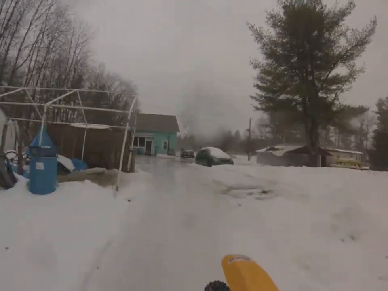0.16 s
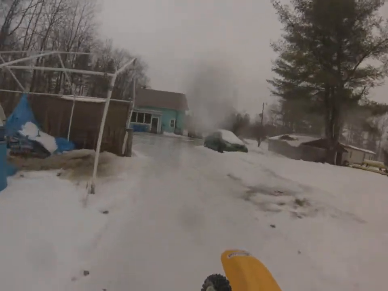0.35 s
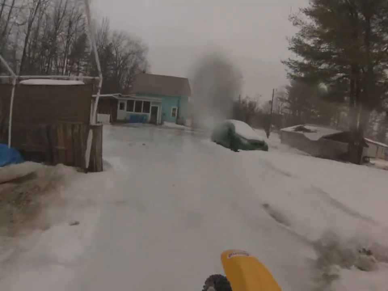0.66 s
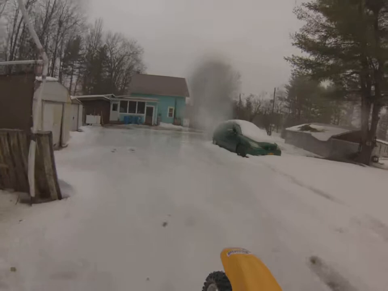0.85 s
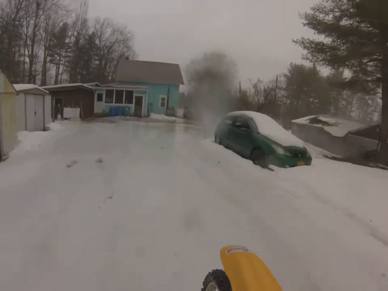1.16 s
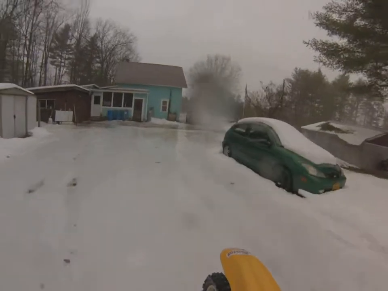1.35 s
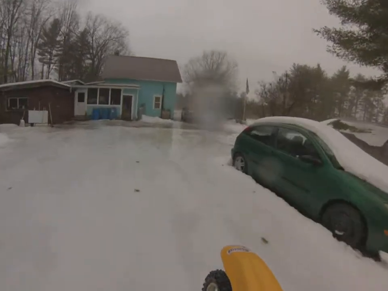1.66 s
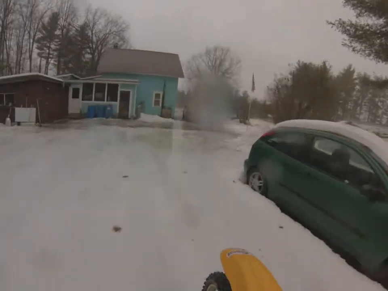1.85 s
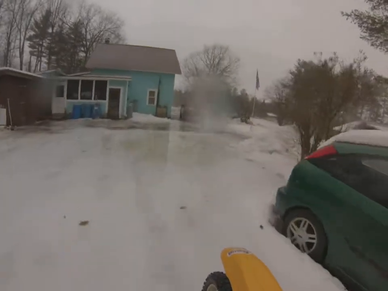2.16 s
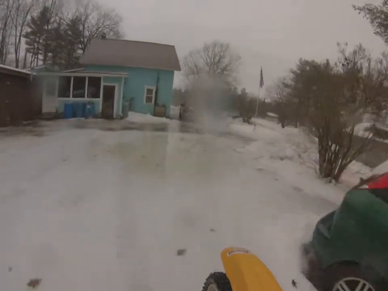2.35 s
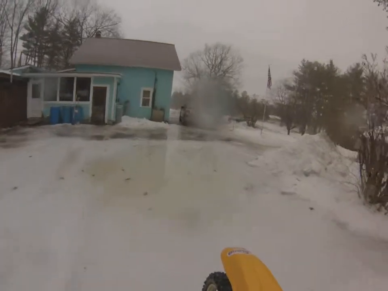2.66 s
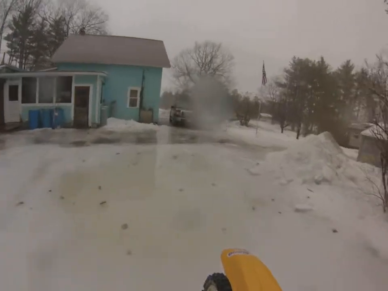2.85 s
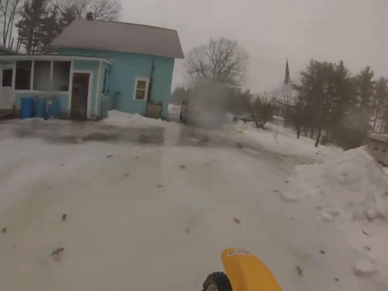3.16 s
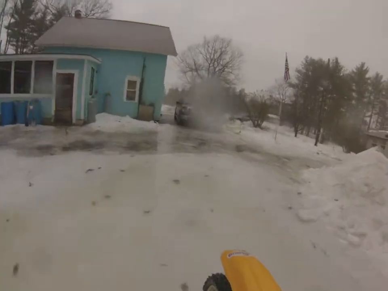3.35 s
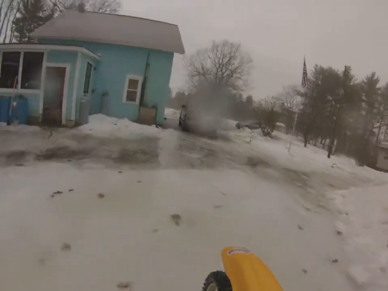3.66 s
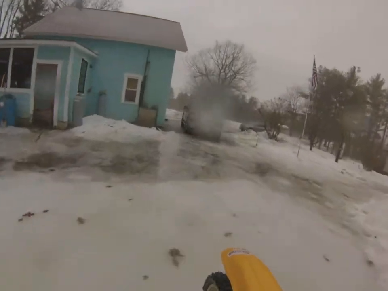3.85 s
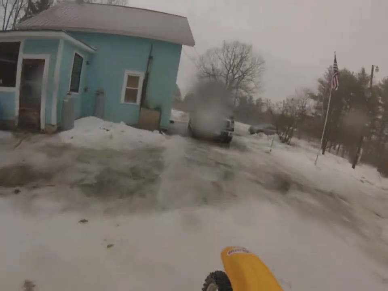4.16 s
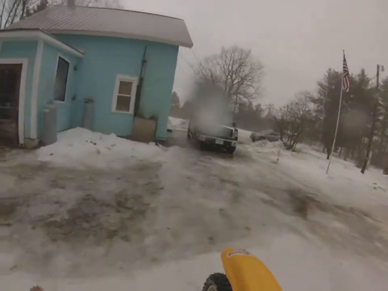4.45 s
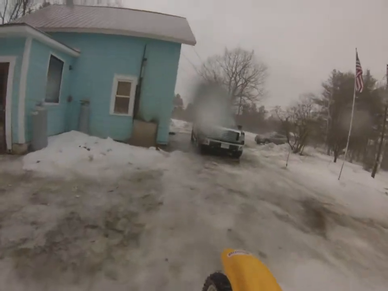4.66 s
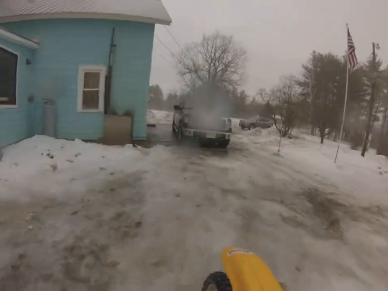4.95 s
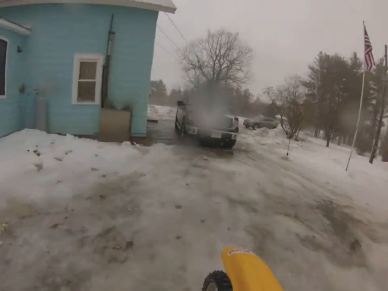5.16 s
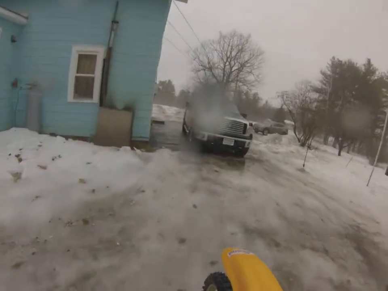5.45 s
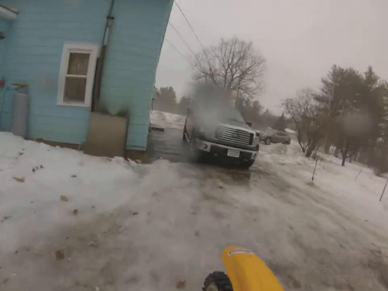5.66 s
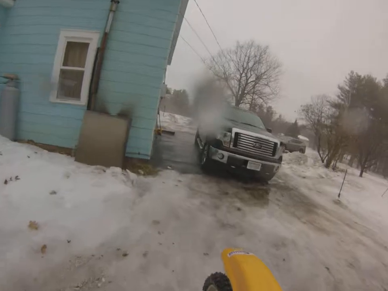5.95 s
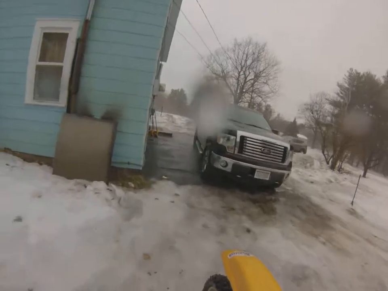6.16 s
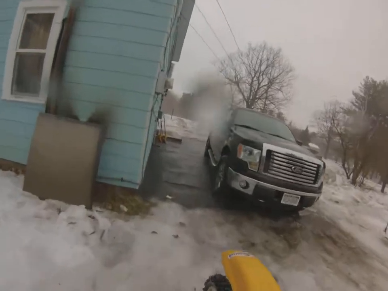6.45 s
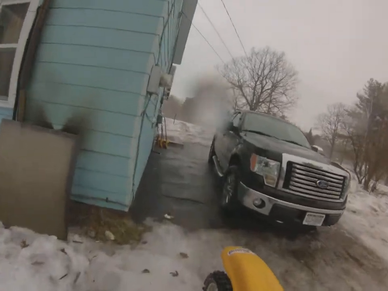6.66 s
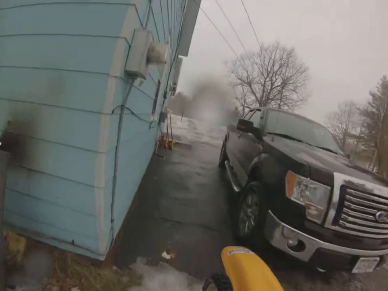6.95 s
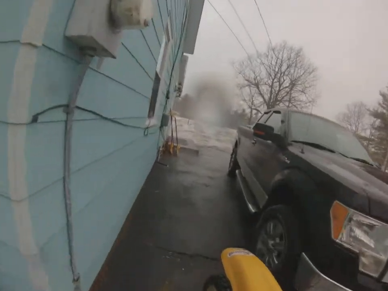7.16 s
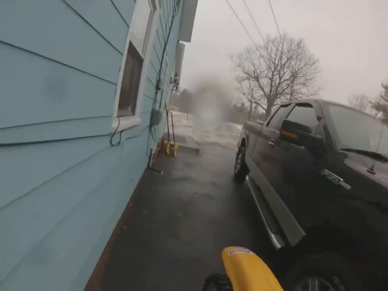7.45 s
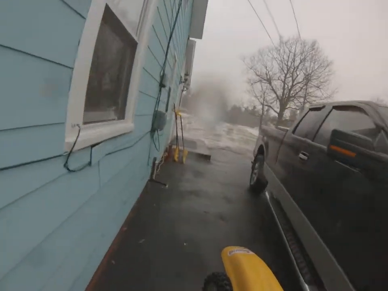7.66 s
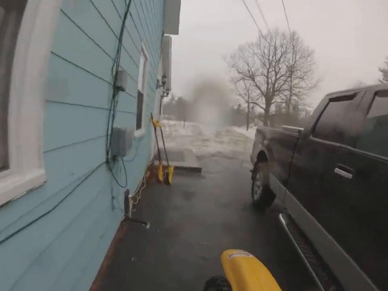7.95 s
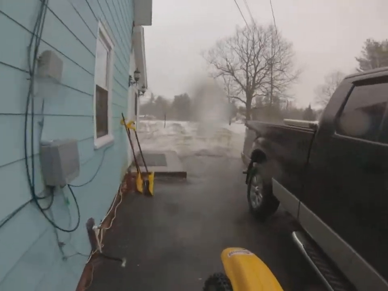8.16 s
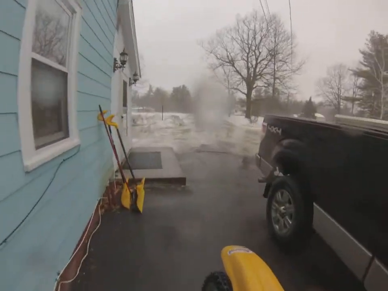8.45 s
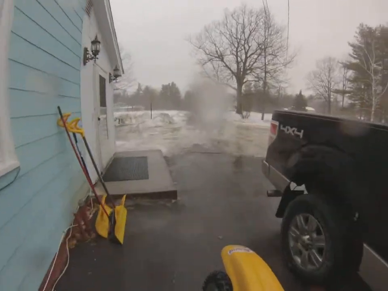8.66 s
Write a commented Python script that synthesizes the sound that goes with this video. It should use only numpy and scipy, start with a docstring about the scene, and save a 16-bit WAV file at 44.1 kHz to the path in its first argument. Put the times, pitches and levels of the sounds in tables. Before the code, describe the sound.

A two-stroke dirt bike is heard close up from the rider's helmet, over a steady, deep wind rumble. It opens with two quick, rasping throttle blips, one right at the start and one around 0.5 seconds, the loudest part. From about 1 second the engine runs slowly down, dropping in pitch and level, with a low throb and dry metallic piston ticking. The tyres crunch softly, and thin ice snaps now and then until about 3 seconds. A small part rattles faintly near 1.5 seconds, and another clacks at 3.2. Slush hisses lightly from 3 to 4 seconds. From about 4 seconds the engine idles lumpily with irregular pops and knocks, quickening a little after 5.5 and continuing until the end near 9 seconds, with faint wet tyre hiss from 7.5. Raindrops tick sharply on the microphone housing several times in the first 2 seconds and once near 4.7.

```python
"""Two blips of the throttle from a two-stroke dirt bike, heard from the rider's helmet. The engine runs
down slowly to a lumpy idle, firing only every few turns, as the bike rolls down an icy driveway in rain.
Puffs of gas make the exhaust pipe ring, pumped air throbs and drones, and the piston knocks on metal.
The tyres crunch over ice and hiss through slush, the headwind rumbles, loose parts rattle and clack,
and a few raindrops tap on the microphone's plastic housing."""
import sys
import numpy as np
from scipy import signal
from scipy.fft import rfft, irfft
from scipy.io import wavfile
from scipy.ndimage import uniform_filter1d

SR = 44100
rng = np.random.default_rng(int(sys.argv[2]) if len(sys.argv) > 2 else 0)


def wav_record(signal):
    """Record a signal, one row per channel, as 16-bit PCM in the file named by sys.argv[1]."""
    frames = np.transpose(np.atleast_2d(signal))
    bounded = np.clip(frames, -1, 1)
    # unit amplitude maps onto the largest positive 16-bit level
    quanta = np.round(bounded * 32767).astype(np.int16)
    wavfile.write(sys.argv[1], SR, quanta)


N = 388080
TIME = np.arange(N) / SR

# single hard firings during the blips: t/s, extra strength/dB, level of the rasp/dB
HARD_FIRINGS = [(0.049, 3.5, -28), (.133, 2, -29), (.160, 3.5, -28), (.199, 1, -35), (0.225, 0, -36),
                (.394, 2, -39), (.422, 5.5, -39), (.471, 5, -24), (0.539, -4, -27), (.613, 5, -42)]
# notes that the cylinder and engine cases ring with: f/Hz, width/Hz, level/dB
ENGINE_RINGS = [(850, 83, -9), (1072, 78, 0.5), (1216.5, 53, 7), (1498, 104, 3), (1621, 131, 6),
                (1746, 42, 6), (1938, 108, -0.5), (2224, 230, -5.5), (2586, 103, -7.5), (3110, 90, -14),
                (3990, 42, -20), (4700, 85, -27.5), (5330, 54, -20)]
# tone colour of breaking ice: f/Hz, relative level/dB
ICE_SPECTRUM = [(1000, -0.5), (3000, 4.5), (3900, -7), (4800, -3.5), (6400, -7), (7600, -7.5),
                (9300, -10.5), (11500, -7.5), (13500, -19), (16000, -25)]


def from_db(db):
    """Turn decibels into a factor to multiply by."""
    return 10 ** (np.asarray(db) / 20)


def rms_one(x):
    """Scale a sound so that its average strength (rms) is 1."""
    return x / np.sqrt(np.mean(x ** 2) + 1e-20)


def in_time(rows):
    """Join a table's points with straight lines: one curve for each column after the time."""
    s, *columns = np.transpose(rows)
    return [np.interp(TIME, s, column) for column in columns]


def evened(x, span_s):
    """Hold the average strength at 1 over stretches of about span_s."""
    size = int(span_s * SR)
    power = uniform_filter1d(uniform_filter1d(x * x, size), size)
    return x / np.sqrt(np.abs(power) + 1e-14)


def keep(x, hz, side, order=2):
    """Keep the "low" or the "high" side of hz; a higher order cuts more steeply."""
    return signal.sosfilt(signal.butter(order, hz, side, fs=SR, output="sos"), x + 1e-18)


def resonate(x, hz, width_hz):
    """Ring at one note; the narrower the width, the longer the ring."""
    r = np.exp(-np.pi * width_hz / SR)
    feedback = [1, -2 * r * np.cos(2 * np.pi * hz / SR), r * r]
    return signal.lfilter(np.array([1, 0, -1]) * (1 - r * r) / 2, feedback, x + 1e-18)


def body(x, rings):
    """An object rings at several notes at once; every other one is added upside down."""
    return sum((-1) ** k * from_db(db) * resonate(x, hz, width)
               for k, (hz, width, db) in enumerate(rings))


def coloured(x, spectrum):
    """Give a noise a tone colour, at average strength 1."""
    hz, db = np.transpose(spectrum)
    bins_hz = np.maximum(np.arange(N // 2 + 1) * SR / N, 1)
    gains = from_db(np.interp(np.log(bins_hz), np.log(hz), db))
    return rms_one(irfft(rfft(x) * gains, N))


def noise():
    """White noise: an even hiss."""
    return rng.standard_normal(N)


def clicks(times, sizes):
    """One sharp click at each time."""
    out = np.zeros(N)
    inside = (times >= 0) & (times < TIME[-1])
    out[(times[inside] * SR).astype(int)] = sizes[inside]
    return out


def puffs(times, sizes, rise_s, decay_s):
    """A loudness curve that swells and dies away after each time."""
    up, down = np.exp(-1 / (rise_s * SR)), np.exp(-1 / (decay_s * SR))
    return signal.lfilter([1 - up], np.poly([up, down]), clicks(times, sizes) + 1e-18)


def strike(times, sizes, grit, rise_s, decay_s):
    """Rough hits: each is a click with a short puff of noise."""
    return clicks(times, sizes) + grit * puffs(times, sizes, rise_s, decay_s) * noise()


def gate(start_s, end_s, rise_s, fall_s):
    """A curve that rises from the start, holds, and falls after the end."""
    return np.clip((TIME - start_s) / rise_s, 0, 1) * np.clip(1 - (TIME - end_s) / fall_s, 0, 1)


def headwind():
    """Air rushing past the rider makes a steady, deep rumble."""
    # tone colour of the wind: f/Hz, relative level/dB
    spectrum = [(15, 3), (28, 2.5), (50, 8), (90, -6.5), (130, -18), (230, -21), (600, -20), (1500, -56),
                (4000, -90)]
    return from_db(-31) * coloured(noise(), spectrum)


def low_hum():
    """A low, rough hum near 250 Hz swells and fades as the engine slows."""
    # loudness of the hum: t/s, level/dB
    levels = [(.6, -35), (1.7, -48.5), (2.3, -42.5), (2.9, -52), (3.3, -39), (3.8, -44), (4.5, -47)]
    hum = resonate(noise(), hz=267.5, width_hz=62)
    hum = resonate(hum, hz=238, width_hz=39)
    return from_db(in_time(levels)[0]) * rms_one(hum)


def ice_and_slush(grains_per_s=250, spread_db=8.5, edge_s=0.16, road_hiss_db=-72):
    """Slush hisses under the tyres; ice crunches in many tiny cracks of uneven size."""
    # patches of ice and slush: start/s, end/s, wet hiss/dB, crunch/dB
    patches = [(0, 0.874, -70, -57), (2.25, 2.3, -71, -62), (3.129, 4.155, -61, -65.5),
               (7.5, 8.795, -68, -84)]
    # tone colour of slush: f/Hz, relative level/dB
    slush_spectrum = [(800, -10), (2500, 9), (4000, -1), (5300, 3), (6000, -29.5), (7500, -1), (8600, -14),
                      (10500, -35), (12300, -31), (13500, -31), (16000, -18)]
    wet, crunch = sum(np.outer(from_db(levels_db), gate(start - edge_s, end, edge_s, edge_s))
                      for start, end, *levels_db in patches)
    sizes = from_db(spread_db * np.minimum(rng.exponential(1, N), 2.5))
    cracked = rng.random(N) < grains_per_s / SR
    grains = puffs(TIME[cracked], sizes[cracked], rise_s=0.0001, decay_s=0.001) * noise()
    slush = np.hypot(wet, from_db(road_hiss_db)) * coloured(noise(), slush_spectrum)
    return slush + crunch * coloured(grains, ICE_SPECTRUM)


def ice_cracks():
    """Now and then a thin plate of ice snaps under a tyre."""
    # single snaps: t/s, level/dB
    snaps = [(0.620, -43), (0.659, -48), (0.780, -44), (0.874, -44), (0.888, -47), (1.402, -47),
             (1.844, -44), (2.288, -49), (2.465, -45.5), (2.811, -48), (2.859, -45.5)]
    s, db = np.transpose(snaps)
    bursts = puffs(s, from_db(db), rise_s=0.0001, decay_s=0.0018)
    return coloured(bursts * noise(), ICE_SPECTRUM) * np.sqrt(np.mean(bursts ** 2))


def raindrops(width_hz=1030):
    """Each drop gives the plastic housing a bright tick; where it lands brings out two notes."""
    # drops: t/s, peak level/dB, first note/Hz, second note/Hz
    drops = [(0.052, -21.5, 7350, 5300), (0.162, -27.5, 11800, 5550), (1.197, -31, 5900, 4630),
             (1.226, -35.5, 12000, 6260), (1.666, -36, 11300, 7560), (1.989, -24.5, 5530, 7600),
             (4.731, -30.5, 9850, 8000)]
    # notes of the housing itself: f/Hz, width/Hz, level/dB
    housing_rings = [(2840, 600, 3.5), (4970, 820, 0.5), (7300, 430, -12), (12400, 910, -13)]
    out = np.zeros(N)
    for s, db, first_hz, second_hz in drops:
        splash = strike(np.array([s]), np.ones(1), grit=0.12, rise_s=0.00013, decay_s=0.0016)
        tick = resonate(splash, first_hz, width_hz)
        tick += from_db(6) * resonate(splash, second_hz, width_hz / 2)
        tick += from_db(2.5) * body(splash, housing_rings)
        out += from_db(db) * tick / np.abs(tick).max()
    return out


def clack(at_s=3.242, peak_db=-30):
    """A loose part strikes the frame once and chatters for an instant."""
    # notes of the part: f/Hz, width/Hz, level/dB
    part_rings = [(2290, 150, 7), (3740, 500, -5), (4460, 530, -2), (6760, 460, -16)]
    hit = strike(np.array([at_s]), np.ones(1), grit=0.13, rise_s=0.00022, decay_s=0.0029)
    ring = body(hit, part_rings)
    return from_db(peak_db) * ring / np.abs(ring).max()


def rattle(times, start_s=1.45, end_s=1.73, scatter_db=1.5, peak_db=-40.5):
    """For a moment the slowing engine shakes a small loose part: one bright tick a turn."""
    # notes of the small part: f/Hz, width/Hz, level/dB
    part_rings = [(4850, 500, -2), (7650, 600, -4), (11400, 1300, -6)]
    ticks = clicks(times, from_db(scatter_db * noise()[:len(times)]))
    ring = body(ticks * gate(start_s, end_s, rise_s=0.06, fall_s=0.06), part_rings)
    return from_db(peak_db) * ring / np.abs(ring).max()


def throttle(lag_s=0.032):
    """What the blips add to speed, bark and clatter; the heavy flywheel makes the speed lag."""
    # blips: opens/s, shuts/s, added speed/(turns per s), added bark/dB, added clatter/dB
    blips = [(0.011, 0.228, 7.2, 3.5, 4.5), (0.368, 0.543, 19, 4, 8.5)]
    speed, bark_db, clatter_db = sum(np.outer(gains, gate(opens, shuts, rise_s=0.099, fall_s=0.055))
                                     for opens, shuts, *gains in blips)
    inertia = np.exp(-1 / (lag_s * SR))
    return signal.lfilter([1 - inertia], [1, -inertia], speed + 1e-18), bark_db, clatter_db


def crank_angle(blip_speed, fired, surge_turns=0.17):
    """How far the engine's shaft has spun, in turns; it surges after each idle firing, then slows."""
    # speed of the shaft without the blips: t/s, speed/(turns per s)
    speeds = [(0, 69.5), (.35, 68), (.62, 68), (.8, 64), (.97, 64.3), (1.05, 58.5), (1.15, 54.5),
              (1.4, 49.3), (1.65, 46), (1.85, 44.3), (2.15, 43), (2.35, 43.5), (2.55, 40.3), (2.85, 38.6),
              (3.2, 38), (3.4, 39.3), (3.57, 41), (3.85, 37), (4.1, 34.5), (4.75, 26.9), (5.25, 24.8),
              (5.5, 28), (7.7, 31), (8.8, 35)]
    turns = np.cumsum(in_time(speeds)[0] + blip_speed) / SR
    firing_s = np.concatenate([np.transpose(HARD_FIRINGS)[0], fired])
    at_firing = np.interp(firing_s, TIME, turns)
    whole = np.cumsum(np.round(np.diff(at_firing, prepend=0)))
    nudge = np.interp(TIME, firing_s, whole - at_firing)  # puts each firing on a whole turn
    progress = np.interp(TIME, fired, np.arange(len(fired))) % 1  # 0 to 1 between idle firings
    return turns + nudge + surge_turns * np.sin(np.pi * progress ** 0.81)


def strokes(angle, fired, pop_db, coast_db=-5.5, scatter_db=2.55):
    """The time and strength of every turn, and whether it is one of the idle firings."""
    times = np.interp(np.arange(np.ceil(angle[0]), angle[-1]), angle, TIME)
    firing_turns = np.abs(times[:, None] - fired).argmin(axis=0)
    level_db = coast_db + scatter_db * noise()[:len(times)]
    level_db[np.minimum(firing_turns + 1, len(times) - 1)] -= 1  # the next turn is a little softer
    level_db[firing_turns] = pop_db
    for s, extra_db, _ in HARD_FIRINGS:
        level_db[np.abs(times - s).argmin()] += extra_db
    return times, from_db(level_db), np.isin(np.arange(len(times)), firing_turns)


def gas_hiss(times, sizes, fired, spit_db, hiss_db):
    """Gas hisses a little on every turn and spits just after each idle firing."""
    # tone colour of the gas: f/Hz, relative level/dB
    spectrum = [(1500, 16.5), (3000, 1.5), (4000, 3), (4900, 1), (5450, 6), (5900, 0), (6500, 4.5),
                (7900, -0.5), (9000, -6.5), (11000, -3.5), (12800, -4.5), (14000, -15), (16000, -19)]
    pulses = puffs(times, sizes ** 0.48, rise_s=0.005, decay_s=0.009) + 0.14
    hiss = from_db(hiss_db + 0.5) * evened(pulses, span_s=0.16)
    spits = puffs(fired + 0.0057, from_db(spit_db + 15.5), rise_s=0.0029, decay_s=0.0062)
    return np.hypot(hiss, spits) * coloured(noise(), spectrum)


def piston_slap(times, late_s=0.00199):
    """The piston slaps the cylinder wall once a turn: a dry tick."""
    # loudness of the slap, highest while the engine coasts: t/s, level/dB
    levels = [(.6, -58), (1.2, -56.5), (1.8, -54.5), (2.4, -50.5), (3.6, -51), (4.4, -53), (8.8, -57.5)]
    # notes that the slap sets ringing: f/Hz, width/Hz, level/dB
    piston_rings = [(1617, 87, 2.5), (1810, 97, 0), (1960, 57, 3.5), (2660, 250, -14), (3115, 80, -15),
                    (5410, 110, -21)]
    sizes = rng.uniform(0.46, 1, len(times))
    hits = strike(times + late_s, sizes, grit=0.27, rise_s=0.00061, decay_s=0.0027)
    ticks = keep(body(hits, piston_rings), 1000, "high")
    return from_db(in_time(levels)[0]) * rms_one(ticks)


def clatter(times, sizes, rise_s=0.0033, decay_s=0.0063, whirr=0.097):
    """The piston knocks and scuffs at the top of each turn, more softly at the bottom; gears whirr."""
    halfway = times[:-1] + np.diff(times) / 2
    bottom_scuffs = puffs(halfway, rng.uniform(0, 0.17, len(halfway)), rise_s, decay_s)
    top_scuffs = puffs(times, sizes ** 0.49, rise_s, decay_s)
    knocks = clicks(times + 0.001954, 1.2 * sizes ** 0.86)
    force = (top_scuffs + bottom_scuffs + whirr) * noise() + knocks
    return evened(keep(body(force, ENGINE_RINGS), 690, "high"), span_s=0.26)


def idle_knocks(fired, pop_db, early_s=0.00094):
    """Each firing at idle also raps the cylinder: one dry metallic knock."""
    sizes = from_db(0.98 * pop_db - 36)
    raps = puffs(fired - early_s, sizes, rise_s=0.00037, decay_s=0.0073) * noise()
    return body(raps, ENGINE_RINGS)


def intake(times, lag_turns=0.4, scatter_db=2.5, jitter_s=0.00031):
    """After each exhaust puff the engine gulps air; the slightly uneven gulps make the inlet drone."""
    # loudness of the drone: t/s, level/dB
    levels = [(.3, -31.5), (.85, -33), (1.15, -37), (1.38, -36), (1.7, -44), (2.3, -36), (2.8, -44),
              (3.3, -38), (4.2, -49), (4.6, -53)]
    # notes of the air inlet: f/Hz, width/Hz, level/dB
    inlet_rings = [(254.4, 35, 1), (371, 57, -2), (467.5, 22.8, 5.5), (649, 45, -3.5), (924, 127, -27)]
    time_chance, size_chance = rng.standard_normal((len(times) - 1, 2)).T
    gulp_times = times[:-1] + lag_turns * np.diff(times) + jitter_s * time_chance
    gulps = clicks(gulp_times, from_db(scatter_db * size_chance))
    drone = keep(body(gulps, inlet_rings), 150, "high")
    return from_db(in_time(levels)[0]) * evened(drone, span_s=0.66)


def throb(angle, times, fires, flutter_s=0.03, flutter_db=2.0, early_s=0.01232):
    """Air pumped once a turn throbs; uneven strokes set the air filter box booming at its own pitch."""
    # loudness of the throb: t/s, relative level/dB
    levels = [(0.0, -16.5), (0.44, -15), (0.49, -22.5), (0.61, -12.5), (1.08, -21), (1.18, -33),
              (1.22, -21), (1.32, -13), (2.4, -15), (2.45, -26), (2.5, -13), (2.65, -22.5), (3.55, -20),
              (3.6, -13), (3.7, -25), (3.75, -17.5), (3.85, -26.5), (4.09, -21.5), (4.26, -34),
              (4.39, -29.5), (4.66, -34), (4.71, -26), (4.95, -24.5), (5.0, -31.5), (5.17, -21.5),
              (5.51, -30), (5.56, -20), (5.78, -35.5), (6.03, -19.5), (6.2, -31), (6.25, -19), (6.37, -31),
              (6.42, -23), (6.77, -30), (6.81, -14.5), (6.98, -26.5), (7.38, -22), (7.55, -31.5),
              (7.65, -21.5), (8.46, -27), (8.55, -20), (8.6, -43), (8.63, -27), (8.8, -23.5)]
    # how unevenly the engine runs: t/s, share of boom (0 to 1), overtones/dB
    unevenness = [(.2, 0.29, -14), (.6, 0.3, -18), (1.05, 0.4, -17.5), (1.35, 0.03, -28), (1.8, 0, -17.5),
                  (2.4, 0.27, -29.5), (3, 0.33, -47), (3.8, 0.97, -34), (4.3, 1, -9)]
    boom_share, overtone_db = in_time(unevenness)
    flutter = rms_one(np.interp(TIME / flutter_s, np.arange(N), rng.uniform(-1.17, 1, N)))
    level_db = in_time(levels)[0] - 0.5 + flutter_db * np.sqrt(np.clip(boom_share, 0, 1)) * flutter
    phase = 2 * np.pi * angle
    overtones = np.cos(2 * phase) + from_db(-11) * np.cos(3 * phase)
    pumped = rms_one(np.cos(phase) + from_db(overtone_db) * overtones)
    gulps = clicks(times - early_s, 1 + fires + 0.37 * rng.standard_normal(len(times)))
    boom = resonate(gulps, hz=46.5, width_hz=2.56)
    boom = evened(keep(boom, 21.2, "low"), span_s=0.43)
    return from_db(level_db) * evened((1 - boom_share) * pumped + boom_share * boom, span_s=0.028)


def rasp(late_s=0.0033):
    """The hardest firings burst from the silencer with a rasping crack."""
    # tone colour of the crack: f/Hz, relative level/dB
    spectrum = [(400, -10), (900, -1), (1500, -6), (2300, -4), (3300, -15), (6000, -27), (12000, -36)]
    s, _, db = np.transpose(HARD_FIRINGS)
    return puffs(s + late_s, from_db(db), rise_s=0.0011, decay_s=0.0078) * coloured(noise(), spectrum)


def exhaust(times, sizes, puff_s=0.0081, steady_rush=0.25, pop_hz=525, pop_width_hz=100):
    """Gas leaves the cylinder with a pop and a rough puff; the pipe rings on, muffled by the silencer."""
    # how much the gas swirls in the pipe: t/s, amount (0 to 1)
    swirl = [(.25, .1), (.45, .25), (.55, .6), (.7, .35), (1.05, .4), (1.35, .2), (2.4, .35), (3.5, .6),
             (4.2, .55)]
    # notes of pipe and silencer; low ones come later, so pops fall: f/Hz, width/Hz, level/dB, delay/s
    pipe_rings = [(256.8, 11.3, -3.5, .004), (333.6, 53, -5, .003), (453.7, 43.5, 4, 0),
                  (500.5, 32.7, 2, 0), (601, 73, -9, 0), (685, 30, -.5, -.0015)]
    # notes of the silencer's shell: f/Hz, width/Hz, level/dB
    shell_rings = [(884, 40, -27), (1188, 39, -14.5), (1462, 23, -17), (1760, 140, -24)]
    rush = (puffs(times, sizes, rise_s=0.000057, decay_s=puff_s) + steady_rush) * noise()
    force = clicks(times, sizes) + in_time(swirl)[0] * rush / np.sqrt(puff_s * SR)
    pipe = sum(from_db(db) * resonate(np.interp(TIME - delay_s, TIME, force), hz, width)
               for hz, width, db, delay_s in pipe_rings)
    charge = np.gradient(times) / np.diff(times).mean()  # a slow turn draws more gas and pops harder
    pop = resonate(clicks(times, charge * sizes), pop_hz, pop_width_hz)
    pop = resonate(pop, pop_hz, pop_width_hz)
    muffled = keep(pipe + from_db(-6) * pop, 670, "low", order=6)
    shell = from_db(1) * body(force, shell_rings)
    return evened(keep(muffled + shell, 200, "high"), span_s=0.38)


def expansion_chamber(pipe, blip_db, ring_per_db=0.3):
    """With the throttle open, the bulge in the exhaust pipe gathers the bark round its own pitch."""
    ring = ring_per_db * blip_db * resonate(pipe, hz=478, width_hz=160)
    return keep(evened(pipe + ring, span_s=1.0), 5000, "low")


def scene():
    """The throttle and the spinning shaft drive the engine; wind, tyres, loose parts and rain join it."""
    # how hard the engine works, without the blips, as relative levels: t/s, bark/dB, clatter/dB, hiss/dB
    engine_load = [(0, -23.5, -31.5, -48.5), (.3, -26.5, -37, -54), (.7, -26.5, -34, -60),
                   (1.0, -28.5, -36.5, -60), (1.15, -35, -39, -64), (1.42, -34.5, -39.5, -59.5),
                   (1.68, -45.5, -46, -65), (2.2, -37.5, -42, -63), (2.85, -36.5, -44, -65.5),
                   (3.6, -39, -41.5, -55), (4.15, -37.5, -43, -61), (4.7, -35.5, -45.5, -72),
                   (5.2, -35.5, -46, -70), (5.55, -35.5, -41.5, -64), (6.1, -32.5, -42.5, -68),
                   (7.0, -35, -42, -60.5), (7.6, -36, -42.5, -58.5), (8.8, -35.5, -41, -57.5)]
    # firings at idle, as relative levels: t/s, pop/dB, spit of gas/dB
    idle_firings = [(4.147, -23.5, -61), (4.336, -29.5, -61.0), (4.526, -28.5, -61), (4.663, -30.5, -78),
                    (4.703, -26.5, -61), (4.893, -26.5, -60.5), (5.077, -28.5, -62.5), (5.193, -30, -59),
                    (5.306, -25, -64), (5.374, -30, -61.5), (5.438, -25, -61), (5.505, -26.5, -62.5),
                    (5.57, -27.5, -64), (5.627, -26.5, -62), (5.693, -29, -62), (5.753, -27, -63),
                    (5.786, -27, -75), (5.853, -20.5, -61), (5.913, -30, -77), (5.951, -21.5, -59),
                    (6.009, -25.5, -76), (6.045, -25.5, -60), (6.105, -31, -77), (6.143, -24.5, -59),
                    (6.237, -22.5, -59), (6.33, -26.0, -59), (6.393, -26, -73), (6.427, -24.5, -60.5),
                    (6.52, -24.5, -61), (6.578, -28.5, -76), (6.617, -26, -60), (6.71, -30, -59.0),
                    (6.776, -29, -59.0), (6.841, -33, -61), (6.934, -33, -63), (7.037, -26.5, -63),
                    (7.1, -30.5, -59), (7.166, -32, -60.5), (7.262, -31, -60), (7.329, -30.5, -58.5),
                    (7.394, -27, -57), (7.46, -31, -56.5), (7.528, -27.5, -57.0), (7.618, -34, -56),
                    (7.682, -31, -56.0), (7.746, -26.5, -55.5), (7.841, -23.5, -57), (7.932, -26, -55.0),
                    (8.025, -26.0, -58), (8.116, -27, -54.5), (8.172, -29, -57), (8.233, -30.5, -56.5),
                    (8.293, -28, -57), (8.351, -32.0, -55), (8.415, -29.5, -56), (8.472, -24.5, -57.0),
                    (8.589, -26.0, -58.0), (8.672, -30.5, -62.0), (8.729, -31, -63.5)]
    bark_db, clatter_db, hiss_db = in_time(engine_load)
    fired, pop_db, spit_db = np.transpose(idle_firings)
    pop_db = pop_db - np.median(pop_db)  # 0 dB is now a typical firing
    blip_speed, blip_bark_db, blip_clatter_db = throttle()
    angle = crank_angle(blip_speed, fired)
    times, sizes, fires = strokes(angle, fired, pop_db)
    port_times = times - 0.0025  # the cylinder's exhaust port opens

    engine = throb(angle, times, fires)
    pipe = exhaust(port_times + 0.001579, sizes)
    engine += from_db(bark_db + blip_bark_db) * expansion_chamber(pipe, blip_bark_db)
    engine += intake(port_times)
    engine += from_db(clatter_db + blip_clatter_db - 5) * clatter(port_times - 0.0022, sizes)
    engine += piston_slap(port_times) + rasp() + idle_knocks(fired, pop_db)
    engine += gas_hiss(port_times, sizes, fired, spit_db, hiss_db + blip_clatter_db)
    background = headwind() + low_hum() + ice_and_slush() + ice_cracks()
    loose_parts = clack() + rattle(times)
    return (engine + background + loose_parts + raindrops())[None]


def record(dry):
    """The very highest treble is cut off steeply."""
    cutoff_hz = 15600
    return signal.sosfilt(signal.ellip(10, 0.1, 80, cutoff_hz, fs=SR, output="sos"), dry)


dry = scene()
out = record(dry)
wav_record(out)
```